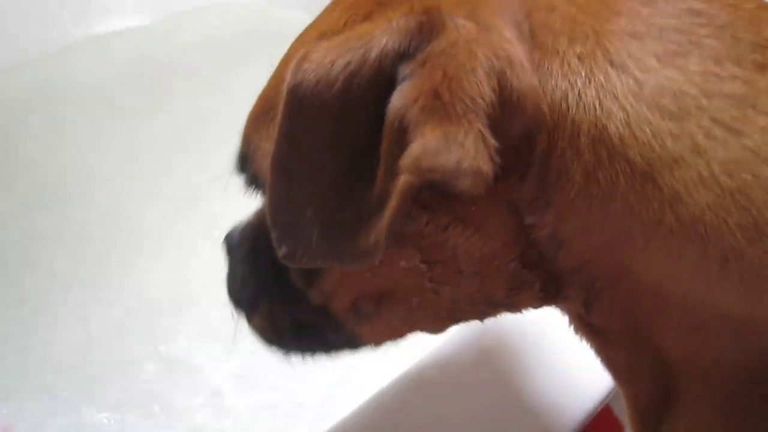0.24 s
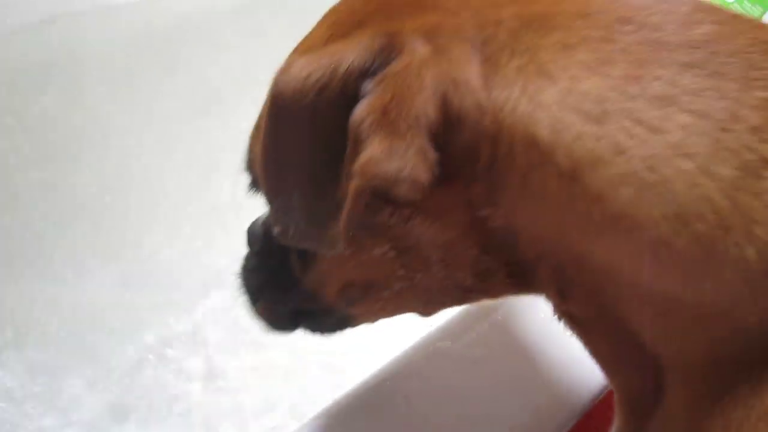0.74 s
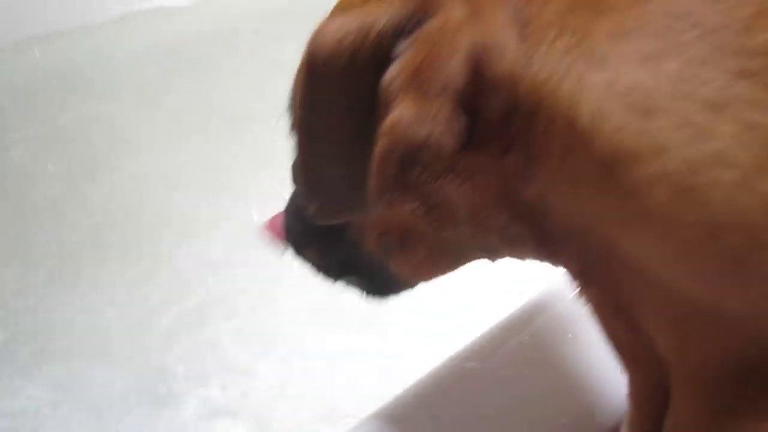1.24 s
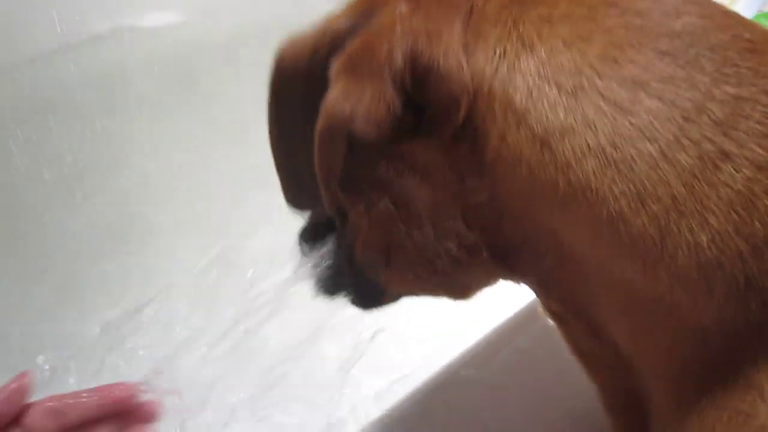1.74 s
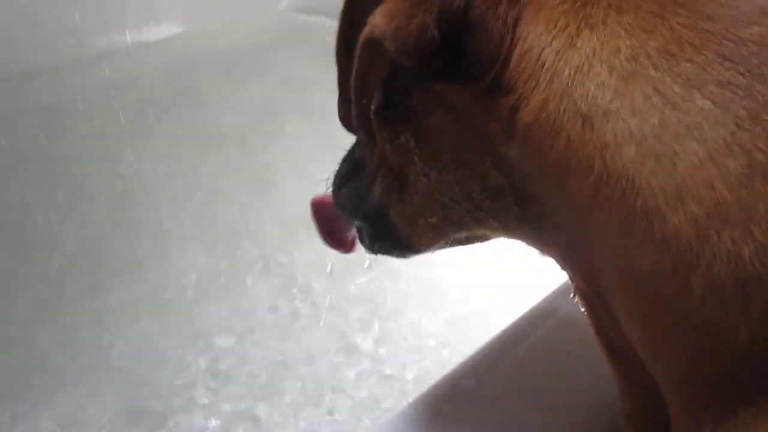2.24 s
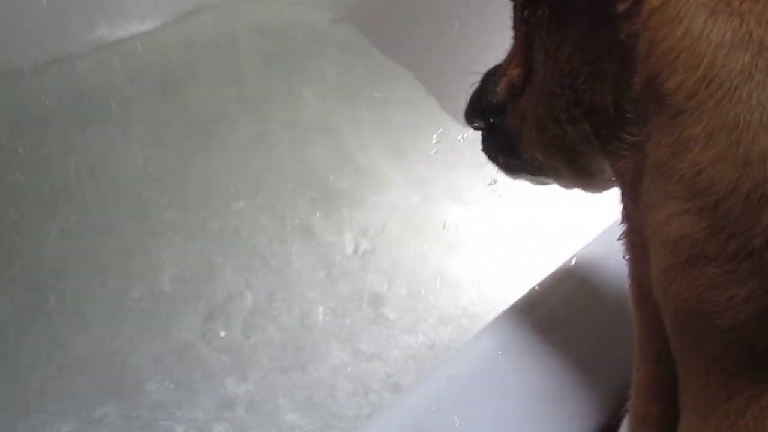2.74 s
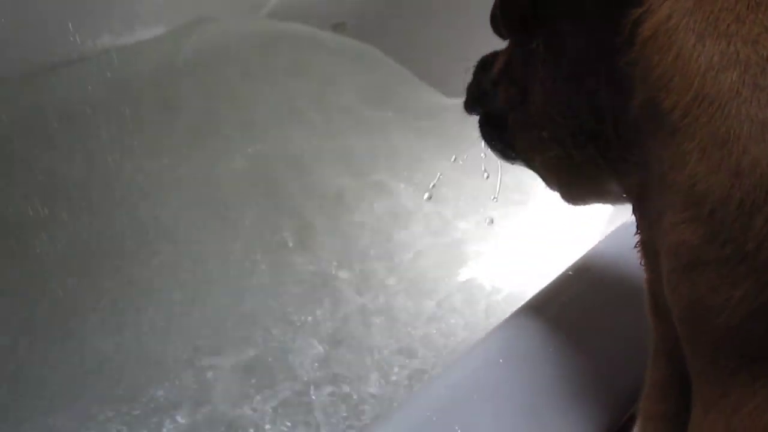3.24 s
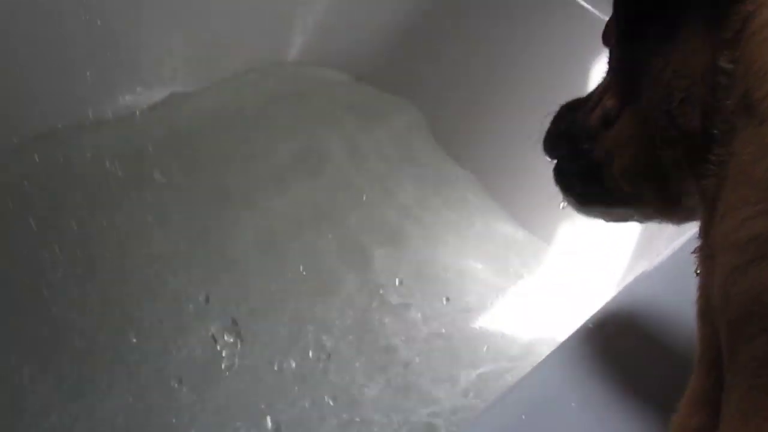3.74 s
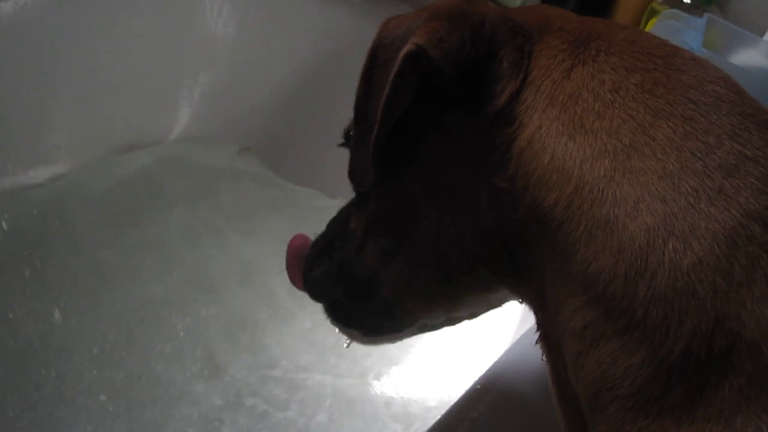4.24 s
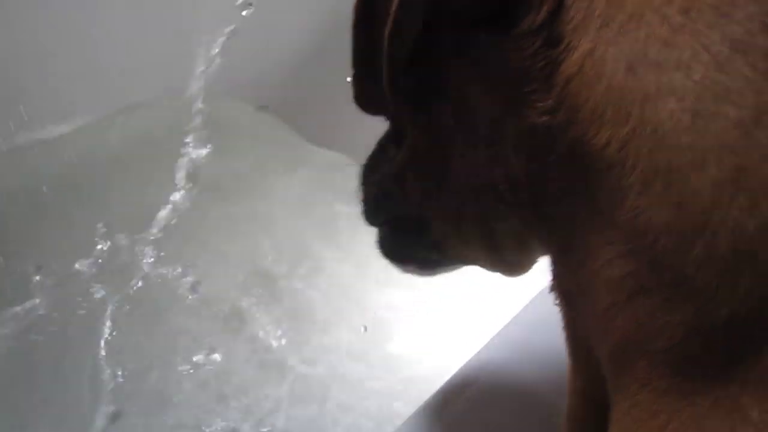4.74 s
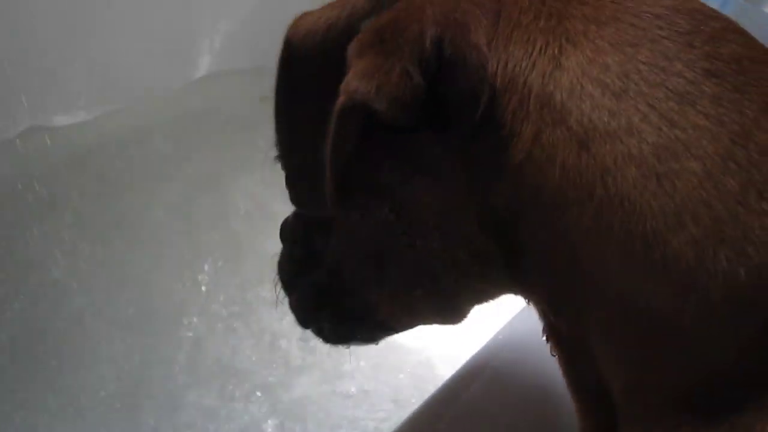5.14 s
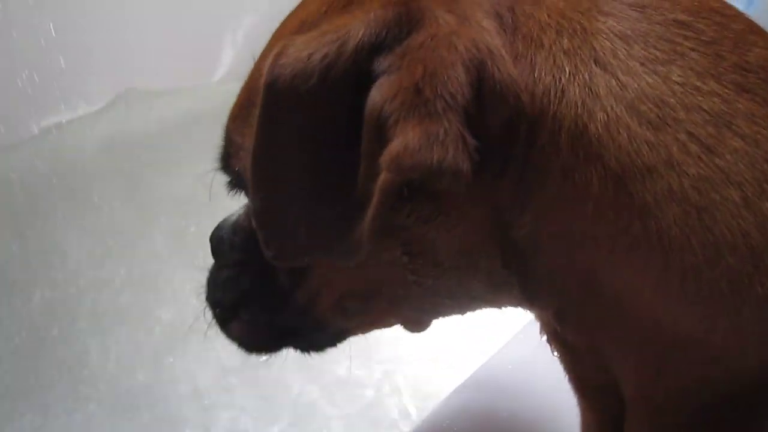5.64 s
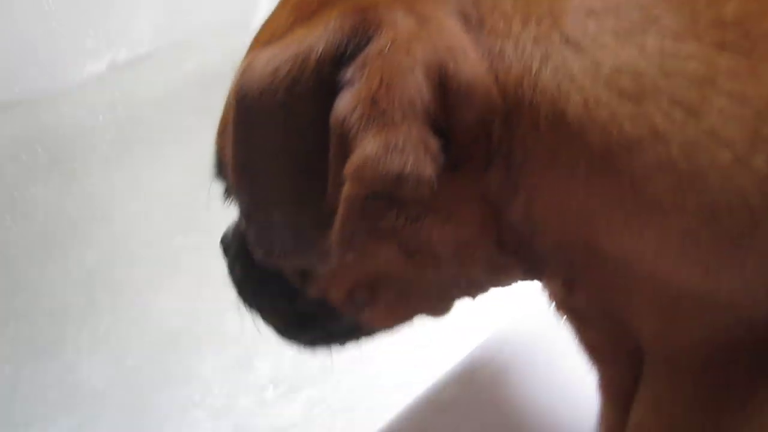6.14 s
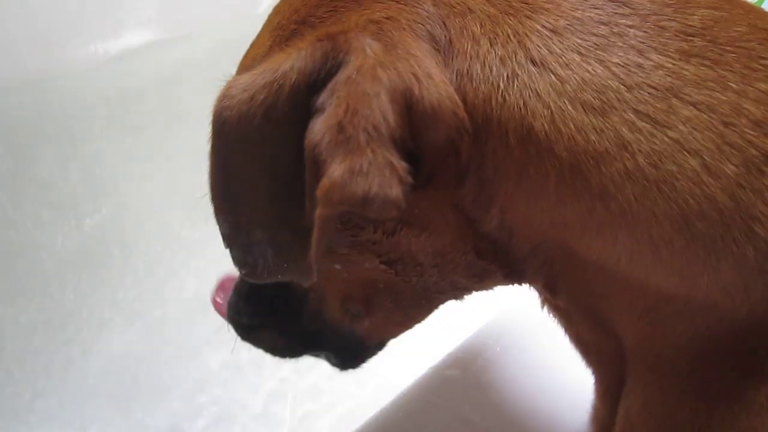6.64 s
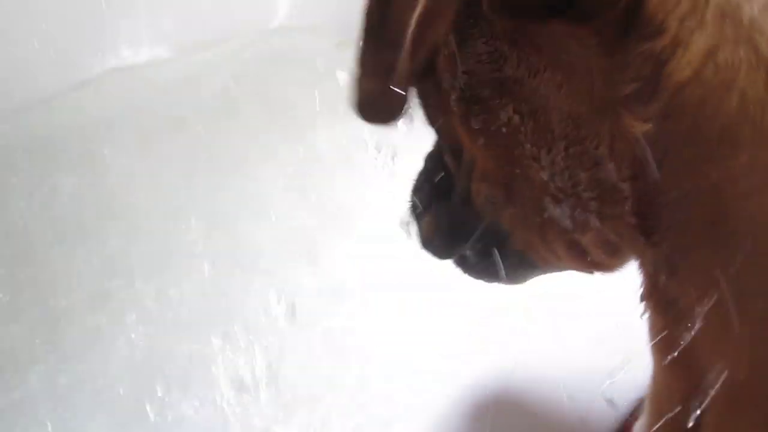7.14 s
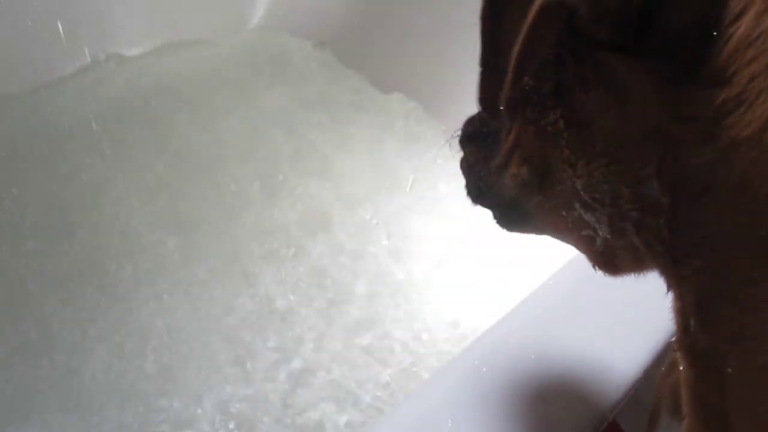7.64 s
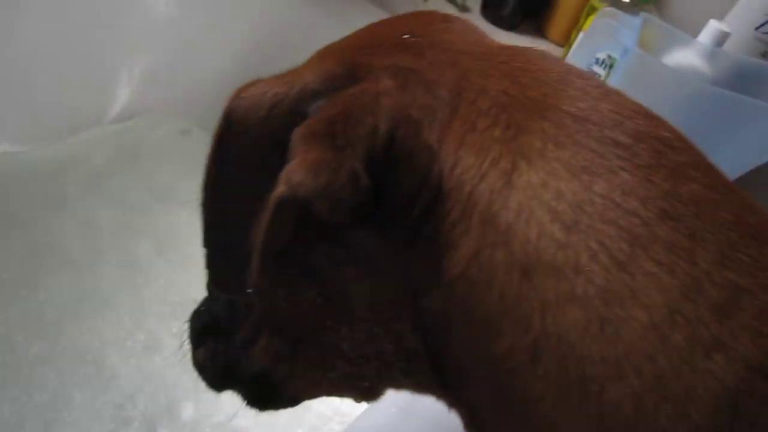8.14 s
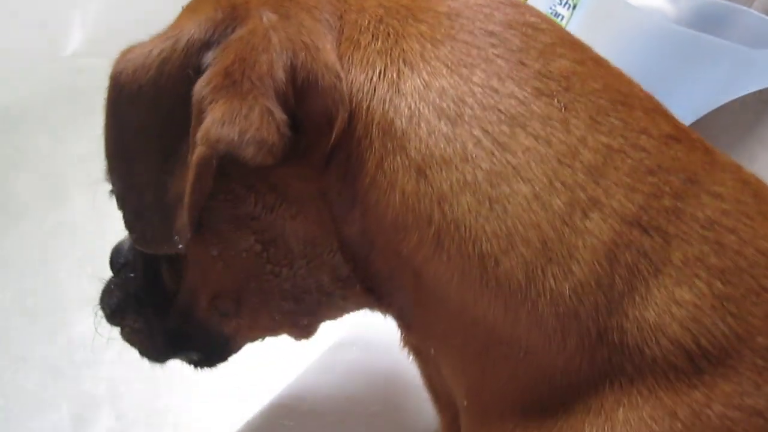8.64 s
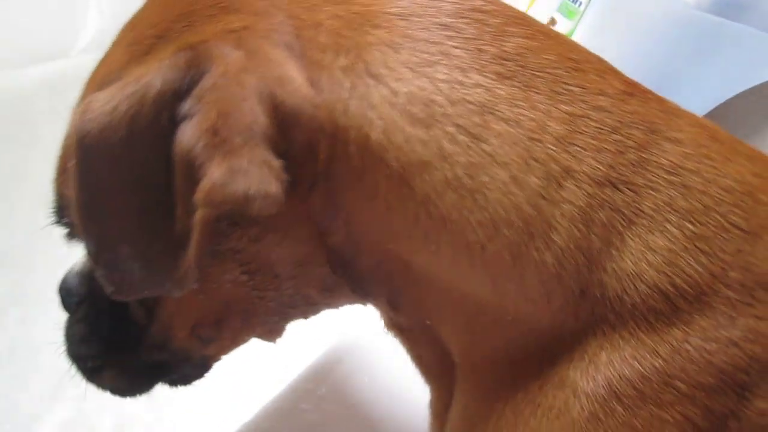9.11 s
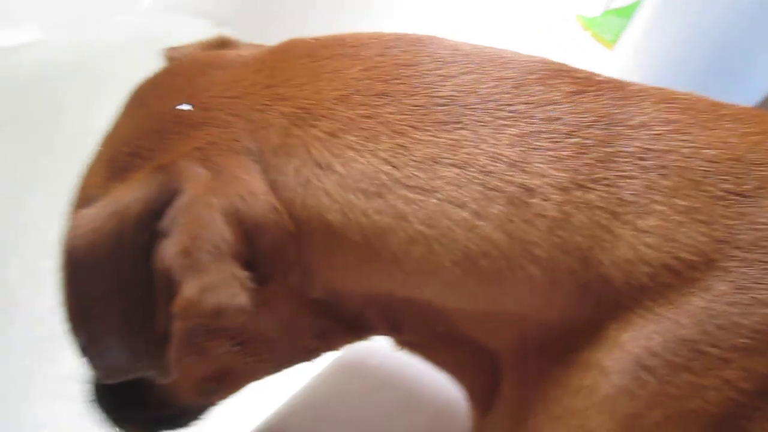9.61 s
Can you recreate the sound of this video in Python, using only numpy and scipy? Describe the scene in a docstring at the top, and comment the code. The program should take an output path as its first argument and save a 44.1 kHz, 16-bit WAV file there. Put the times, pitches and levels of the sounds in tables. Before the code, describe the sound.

A tap pours forcefully into a half-full bathtub throughout, a bright, fizzy, crackling hiss with small bubbling and a barely audible low rumble. A hand flicks the water now and then, making short hollow slaps, bubbly plops and pattering flung drops, thinning out after seven seconds. A few nearby drops tick sharply. Close microphone in a small tiled bathroom with short bright reverberation.

```python
"""Throughout, a tap runs hard into a half-full bathtub in a tiled bathroom: patchy noise for spray, damped sines for
crackle, fizz and bubbles. Under it lies a low, narrow rumble, probably tub and pipes: two wavering noise bands.
From 0.2 to 6.8 s a hand flicks the water: band noise slaps, then trapped air plops as rising, fading sines.
Flung water patters back from the first slap to 9 s; large bubbles ring at times and random faint ones stray.
From 0.6 to 7.5 s a few nearby drops tick: very short sine pulses."""
import sys
import numpy as np
from scipy import signal
from scipy.fft import rfft, irfft, next_fast_len
from scipy.io import wavfile
from scipy.ndimage import uniform_filter1d, map_coordinates

SR = 44100
rng = np.random.default_rng(int(sys.argv[2]) if len(sys.argv) > 2 else 0)


def pcm_store(signal):
    """Save signal as 16-bit PCM."""
    levels = np.round(np.clip(np.atleast_2d(signal), -1, 1) * 32767)
    wavfile.write(sys.argv[1], SR, levels.astype(np.int16).T)


N = 435266

# Reverberation of the tiled room: freq_hz, t60_s
TILE_DECAY = [(200, 0.32), (2000, 0.4), (12000, 0.61)]
# Low resonances of tub and pipes: centre_hz, half_width_hz, level_db (rms)
RUMBLE_MODES = [(69.4, 5.8, -61.5), (100, 10.4, -61)]
# Nearby drops: start_s, level_db (dry envelope peak)
DROP_TICKS = [(.5678, -4), (2.385, -5), (7.292, -6), (7.394, -8), (7.526, 0)]
# Large air bubbles: start_s, pitch_hz, level_db (dry, before fade)
LARGE_BUBBLES = [(.298, 785, -26), (1.438, 1205, -21), (1.778, 872, -24), (1.83, 583, -26),
                 (2.597, 1005, -20), (3.758, 774, -22), (4.604, 574, -25.5), (4.908, 535, -32),
                 (5.354, 1024, -23), (6.694, 598, -30.5), (6.72, 750, -28), (7.41, 620, -30.5),
                 (7.758, 547, -31), (8.995, 843, -24.5)]
# Flung water landing: start_s, level_db (dry churn, before fade), pitch_hz
FLUNG_SPATTERS = [(.21, -19.5, 1560), (.88, -24, 2000), (2.731, -17, 3470), (3.85, -25, 1360),
                  (4.755, -24, 1450), (4.854, -19, 3200), (4.882, -19, 3180), (6.766, -19, 2500),
                  (6.802, -18, 1930), (7.153, -16, 2900), (9.029, -28, 1076)]
# Hand slaps, and at 0.92 s a splash of flung water landing: start_s, churn_db (dry, before fade),
# cavity_pitch_hz, t60_s, trapped_air_db (dry, before fade)
HAND_SLAPS = [(.228, -26.5, 1120, .3, -23), (.92, -20.5, 1620, .12, -19), (1.828, -34, 680, .22, -31),
              (2.107, -38, 378, .2, -35), (2.219, -26, 853, .27, -15.5), (3.848, -23.5, 760, .17, -20.5),
              (4.526, -24.5, 825, .3, -27), (4.875, -37, 525, .22, -27), (6.81, -25, 841, 0.22, -19)]
# Relative spectrum of the jet: freq_hz, gain_db
JET_SPECTRUM = [(20, -28), (130, -29), (190, -25), (300, -17.5), (480, -20), (740, -16), (1200, -7),
                (2000, -3), (2550, -0.5), (3400, -0.74), (4200, -3), (5300, -4), (6500, -1.5), (10500, -5),
                (13000, -12.5), (17000, -28.5)]
# Hollow tub resonances on the jet: centre_hz, width_hz, gain_db
TUB_MODES = [(735, 37, 4), (963, 18, 6), (1186, 230, 2.5), (1424, 71, -2), (1499, 58, 3), (2600, 300, 0.9)]

FLOW_RMS_DB = -18.5
TICK_HZ = 6450
CHURN_PITCH_RATIO = .9  # slap churn / cavity pitch
SPATTER_T60_S = .13
RING_T60_CYCLES = 76  # large bubbles
GULP_GAP_S, GULP_PITCH_RATIO, GULP_LOSS_DB = .029, 0.97, 5.5  # first gap; ratio and loss per bubble
STRAYS_PER_S, STRAY_MID_HZ, STRAY_MID_DB = .9, 878, -34
TOP_HZ = 17200


def amp(db):
    """Decibels to gain."""
    return 10 ** (np.asarray(db) / 20)


def unit(x):
    """Scale to rms 1."""
    return x / np.sqrt(np.mean(x ** 2) + 1e-20)


def along(points, hz):
    """Interpolate (freq_hz, value) points on a log frequency axis."""
    freq_hz, value = np.transpose(points)
    return np.interp(np.log(hz + 1), np.log(freq_hz + 1), value)


def wobble(knots_per_s):
    """Smooth random curve."""
    knots = rng.standard_normal(int(N * knots_per_s / SR) + 4)
    return map_coordinates(knots, [np.arange(N) * knots_per_s / SR])


def filtered(x, response):
    """Apply a gain that is a function of frequency in Hz."""
    size = next_fast_len(N + SR // 2)
    spectrum = rfft(x, size) * response(np.fft.rfftfreq(size, 1 / SR))
    return irfft(spectrum, size)[:N]


def add(track, start_s, sound):
    """Mix a sound into a track."""
    part = track[max(round(start_s * SR), 0):][:len(sound)]
    part += sound[:len(part)]


def patchy_noise(patchy_db, size=512):
    """White noise whose bands swell and fade in short random patches."""
    z = signal.stft(rng.standard_normal(N), nperseg=size)[2]
    patches = uniform_filter1d(rng.standard_normal(z.shape), size=14, axis=0)  # across frequency
    patches = uniform_filter1d(patches, size=9, axis=1)  # across time
    noise = signal.istft(z * amp(patchy_db * unit(patches)), nperseg=size)[1]
    return unit(noise[:N])


def grains(per_s, low_hz, high_hz, decay_cycles, spread_db, size):
    """Damped sines at random times, pitches and strengths; gain follows pitch to even the spectrum."""
    when, pitch, strength = rng.random((int(per_s * N / SR), 3)).T
    pitch_hz = (low_hz * (high_hz / low_hz) ** pitch)[:, None]
    gain = amp(-spread_db * np.log(strength + .02))[:, None] * pitch_hz
    cycles = pitch_hz * np.arange(size) / SR
    rings = gain * np.exp(-cycles / decay_cycles) * np.sin(2 * np.pi * cycles)
    rings *= np.linspace(1, 0, size)
    where = (when * N).astype(int)[:, None] + np.arange(size)
    return unit(np.bincount(where.ravel(), rings.ravel(), N)[:N])


def bathroom(x, wet_db):
    """Direct sound plus the tiles' dense noise tail, scaled to hold power."""
    hz, t, z = signal.stft(rng.standard_normal(SR // 2), SR, nperseg=256)
    decay = amp(-60 * t / along(TILE_DECAY, hz)[:, None])
    tail = signal.istft(z * decay, SR, nperseg=256)[1]
    delayed = np.pad(tail, (SR // 400, 0))  # 2.5 ms
    echo = signal.fftconvolve(x, delayed / np.linalg.norm(tail))[:N]
    return (x + amp(wet_db) * echo) / np.hypot(1, amp(wet_db))


def rumble():
    """The flow shakes two low, narrow resonances, which waver slowly."""
    out = np.zeros(N)
    for centre_hz, half_width_hz, level_db in RUMBLE_MODES:
        noise = rng.standard_normal(N)
        band = filtered(noise, lambda hz: 1 / (1 + ((hz - centre_hz) / half_width_hz) ** 4))
        out += amp(level_db) * unit(band * amp(1.9 * wobble(3.5)))
    return out


def ticks(swell_s=0.00024):
    """A drop bursting close by gives only a few cycles."""
    out, t = np.zeros(N), np.arange(SR // 200) / SR
    pulse = np.sin(2 * np.pi * TICK_HZ * t) * t / swell_s * np.exp(1 - t / swell_s)
    for start_s, level_db in DROP_TICKS:
        add(out, start_s, amp(level_db) * pulse)
    return out


def strays(span_octaves=0.81, span_db=4):
    """(start_s, pitch_hz, level_db) of faint bubbles the stirred water lets go at random."""
    draws = rng.random((round(STRAYS_PER_S * N / SR), 3))
    return [(when * N / SR,
             STRAY_MID_HZ * 2 ** (span_octaves * (pitch - .5)),
             STRAY_MID_DB + span_db * (strength - .5))
            for when, pitch, strength in draws]


def gulps(slowing=1.55, count=3):
    """(start_s, pitch_hz, level_db) of air trapped by each slap: bubbles ever later, deeper and weaker."""
    return [(start_s + GULP_GAP_S * k ** slowing, pitch_hz * GULP_PITCH_RATIO ** k, air_db - GULP_LOSS_DB * k)
            for start_s, _, pitch_hz, _, air_db in HAND_SLAPS for k in range(count)]


def plops(rise=0.066, attack_s=0.0013):
    """Trapped bubbles ring, the deeper the longer, and climb in pitch as they near the surface."""
    out, t = np.zeros(N), np.arange(SR // 5) / SR
    onset = 1 - np.exp(-t / attack_s)
    for start_s, pitch_hz, level_db in LARGE_BUBBLES + gulps() + strays():
        t60_s = RING_T60_CYCLES / pitch_hz
        phase = 2 * np.pi * pitch_hz * (t + rise * t * t / t60_s)
        add(out, start_s, np.sin(phase) * amp(level_db - 60 * t / t60_s) * onset)
    return out


def slaps(breadth=1.42, attack_s=0.00052, scatter=0.159, bubble_db=-4, decay_cycles=14, count=7):
    """Each slap or spatter opens a cavity: a hollow burst, then bubbles around its pitch as it closes."""
    out, t = np.zeros(N), np.arange(SR // 3) / SR
    onset = 1 - np.exp(-t / attack_s)
    hand = [(s, db, CHURN_PITCH_RATIO * hz, t60) for s, db, hz, t60, _ in HAND_SLAPS]
    flung = [(s, db, hz, SPATTER_T60_S) for s, db, hz in FLUNG_SPATTERS]
    for start_s, level_db, pitch_hz, t60_s in hand + flung:
        edges_hz = [pitch_hz / breadth, pitch_hz * breadth]
        band = signal.butter(2, edges_hz, "bandpass", fs=SR, output="sos")
        churn = unit(signal.sosfilt(band, rng.standard_normal(len(t))))
        add(out, start_s, churn * amp(level_db - 60 * t / t60_s) * onset)
        delays = rng.random(count)  # share of t60_s / 2
        bubbles_hz = pitch_hz * np.exp(scatter * rng.standard_normal(count))
        for late, hz in zip(delays, bubbles_hz):
            ring = np.sin(2 * np.pi * hz * t * (1 + t)) * np.exp(-hz * t / decay_cycles) * onset
            gain = amp(level_db + bubble_db - 18 * late)  # later is weaker
            add(out, start_s + late * t60_s / 2, ring * gain)
    return out


def jet_colour(hz):
    """Gain of the jet's broad spectrum with the tub's resonances on it."""
    hollow_db = sum(gain_db / (1 + (2 * (hz - centre_hz) / width_hz) ** 2)
                    for centre_hz, width_hz, gain_db in TUB_MODES)
    return amp(along(JET_SPECTRUM, hz) + hollow_db)


def tap():
    """The jet breaks into spray, drops crackle on the surface and entrained bubbles ring."""
    spray = patchy_noise(patchy_db=1.2)
    crackle = grains(per_s=2800, low_hz=3900, high_hz=19000, decay_cycles=.9, spread_db=4.0, size=70)
    fizz = grains(per_s=1900, low_hz=2000, high_hz=16000, decay_cycles=7, spread_db=3.3, size=260)
    bubbles = grains(per_s=260, low_hz=600, high_hz=3200, decay_cycles=14, spread_db=3.0, size=1400)
    water = spray + amp(-2.2) * crackle + amp(-4.5) * fizz + amp(-13) * bubbles
    # the plunging jet flutters: all layers surge a little together
    surge = amp(0.074 * wobble(22) + 0.53 * wobble(90))
    in_room = bathroom(water * surge, wet_db=-10.5)
    return unit(filtered(in_room, jet_colour)) * amp(FLOW_RMS_DB)


def scene():
    """Rumble, drops, hand splashes and running water in one room."""
    steady = tap() + rumble()
    drops = bathroom(ticks(), wet_db=-13)
    splashes = bathroom(slaps() + plops(), wet_db=-4.5)
    return (steady + drops + splashes)[None]


def record(dry):
    """Round off the tallest peaks, then cut everything from TOP_HZ up."""
    rounded = dry / (1 + np.abs(dry / .9) ** 6) ** (1 / 6)
    return np.array([filtered(channel, lambda hz: hz < TOP_HZ) for channel in rounded])


dry = scene()
out = record(dry)
pcm_store(out)
```